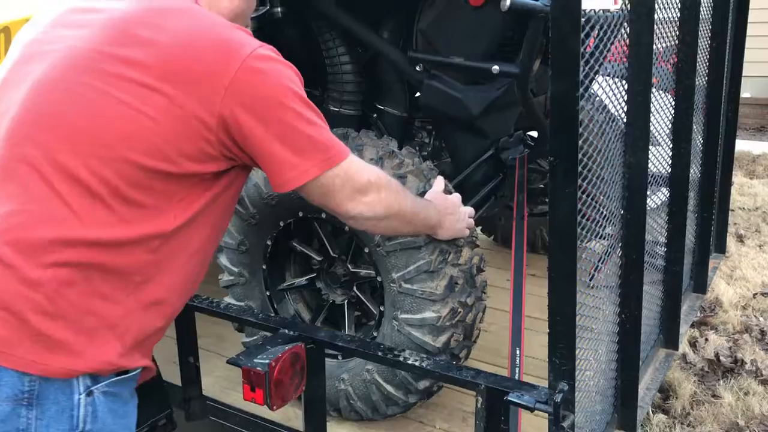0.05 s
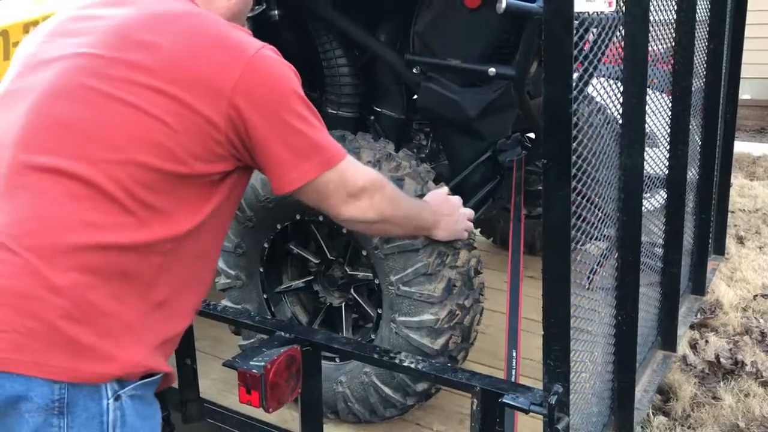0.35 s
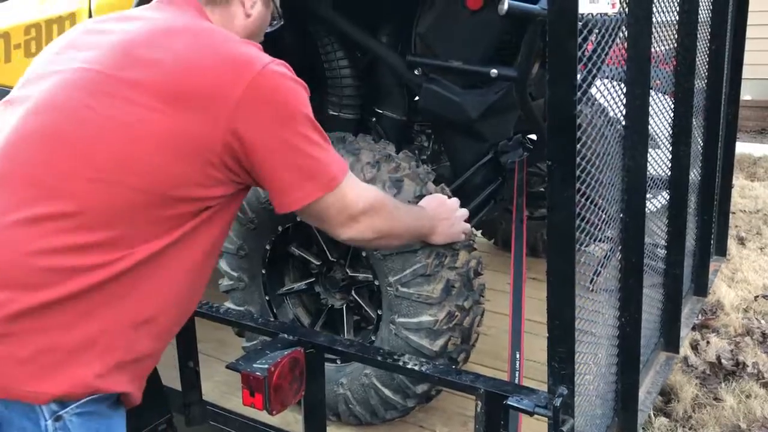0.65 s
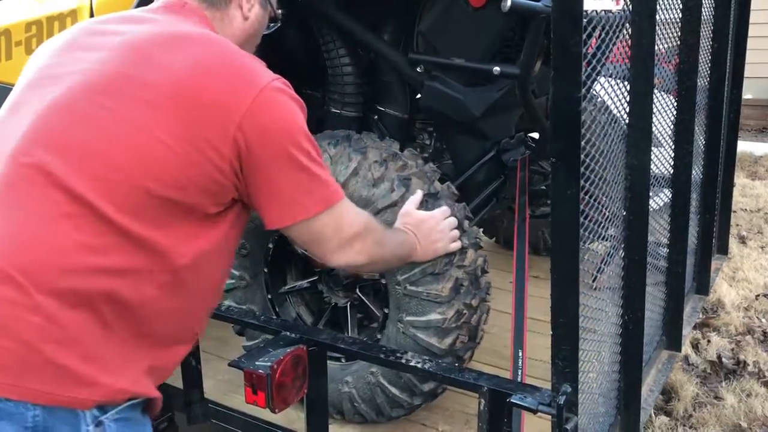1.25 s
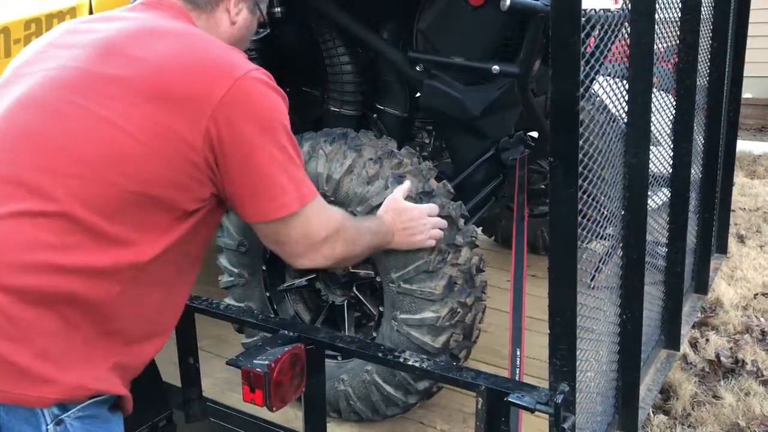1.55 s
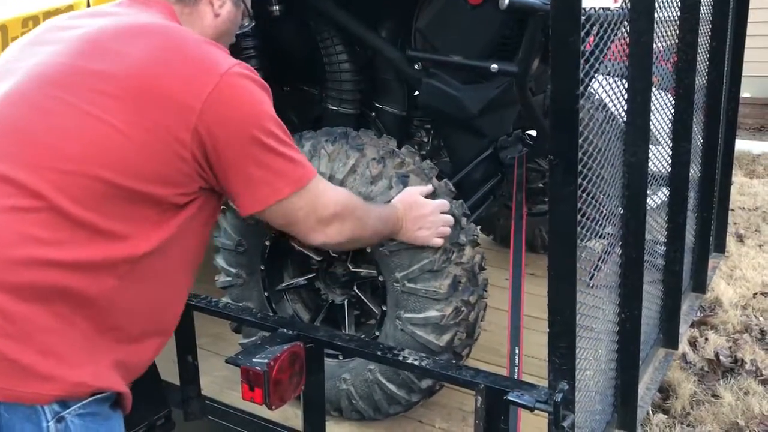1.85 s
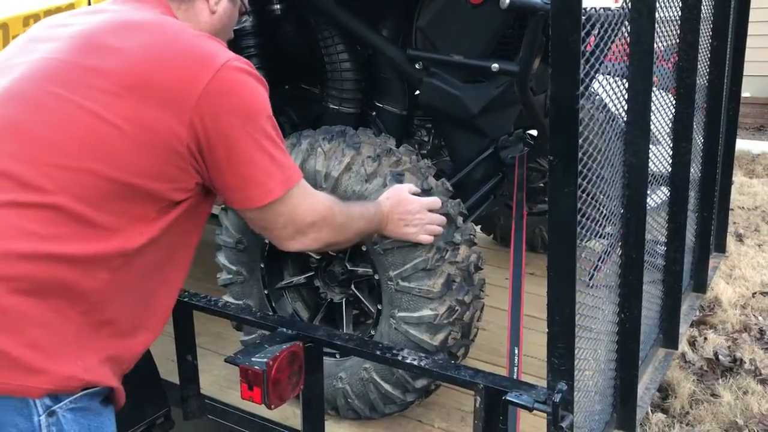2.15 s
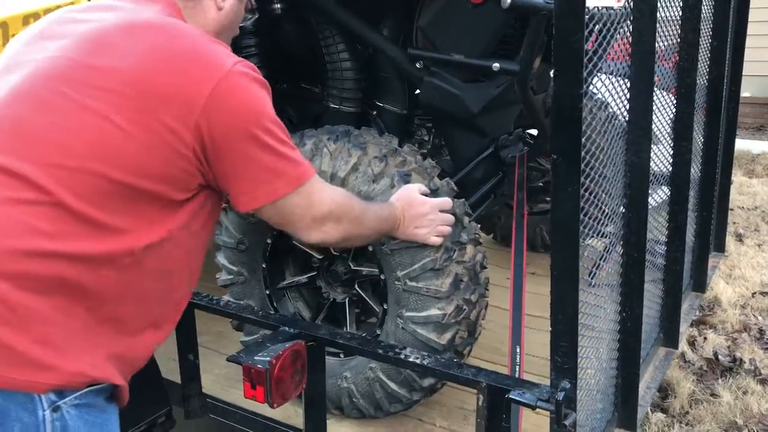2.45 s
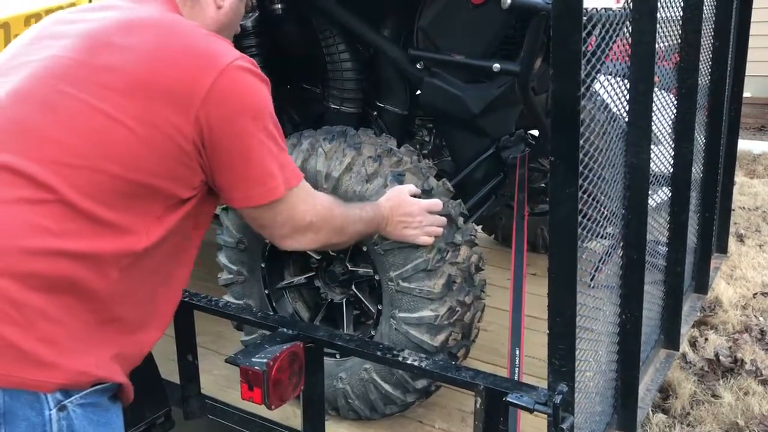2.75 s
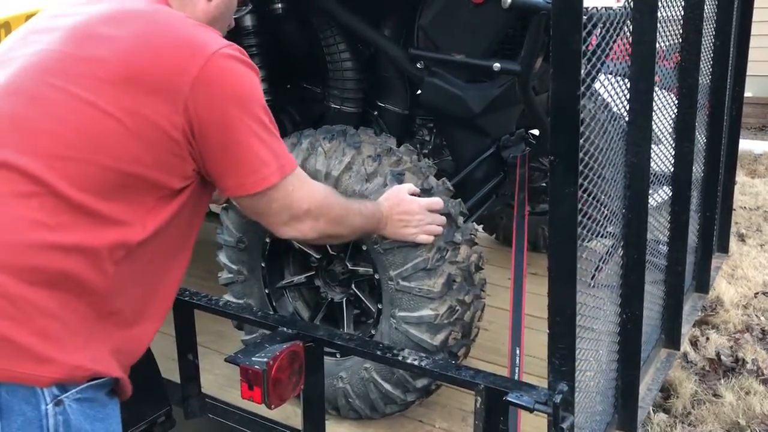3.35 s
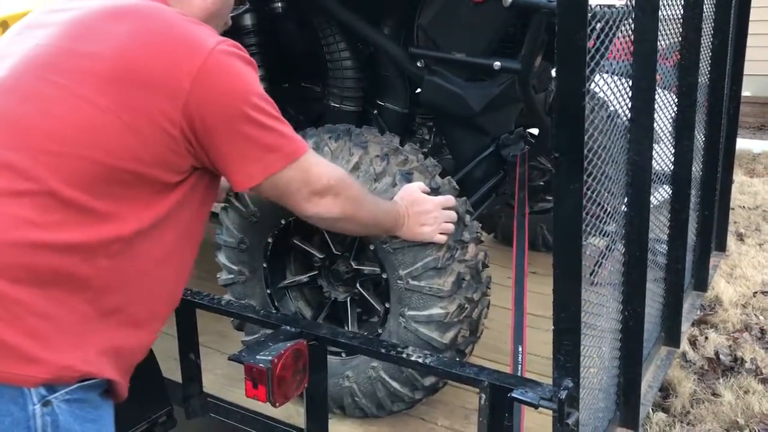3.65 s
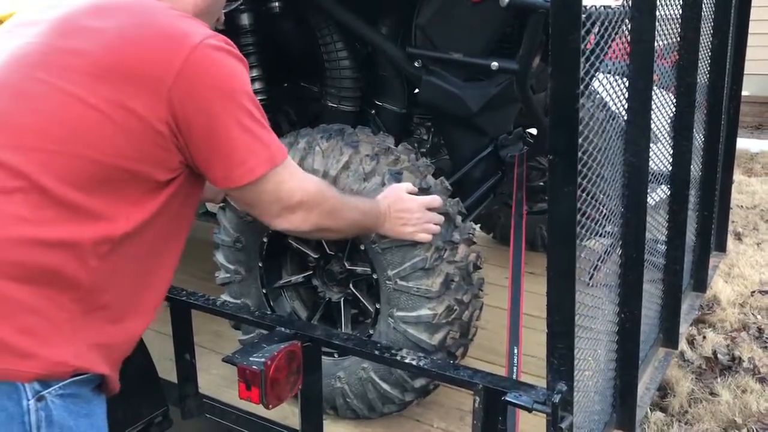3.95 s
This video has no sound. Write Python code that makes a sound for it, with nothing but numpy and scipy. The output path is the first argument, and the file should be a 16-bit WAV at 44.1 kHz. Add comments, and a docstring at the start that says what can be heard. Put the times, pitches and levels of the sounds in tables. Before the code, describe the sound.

Close metallic clunks come from a loose suspension joint, sparse at first, then in an even back-and-forth rhythm. Behind them, a hand rustles on the tire, small hardware clinks and a trailer rumbles in quiet outdoor air.

```python
"""Outdoors on a trailer, an off-road tyre is rocked by hand. A loose suspension joint scrapes through its
play and knocks between two steel stops: one clean clunk on each push, a short stutter on each pull.
Underneath, the trailer thuds and rumbles. Hand and shirt rub on the tread, grit ticks, the linkage
clinks and small hardware jingles, all over a bed of quiet air."""
import sys
import numpy as np
from scipy import signal
from scipy.fft import irfft
from scipy.io import wavfile
from scipy.ndimage import uniform_filter1d

SR = 44100
rng = np.random.default_rng(int(sys.argv[2]) if len(sys.argv) > 2 else 0)


def dump_mix(stems):
    """Bounce the given channels to the path in sys.argv[1] as a 16-bit WAV at rate SR."""
    frames = np.atleast_2d(stems).T  # one column per channel
    limited = np.clip(frames, -1, 1)  # hard clip at full scale
    pcm = np.round(limited * 32767).astype(np.int16)
    wavfile.write(sys.argv[1], SR, pcm)


N = 176400
T = np.arange(N) / SR
AGE = T[:SR // 2]  # time since a hit

# Levels are relative. A colour is a noise spectrum, per Hz; only its shape counts.
# colour of the outdoor air: f/Hz, level/dB
AIR_COLOUR = [(25, -18), (50, 16.5), (100, 18.5), (200, 7), (350, 0.5), (700, -3.5), (1500, -6), (4000, -3),
              (8000, -7), (11000, -9.5), (13000, -15), (16000, -16.5)]
# rumble of the rocking trailer, as a fader ride: t/s, level/dB
RUMBLE_RIDE = [(0, -79.5), (.6, -64.5), (1.4, -62.5), (1.65, -73), (2, -60.5), (2.5, -62), (2.9, -51),
               (3.2, -55), (3.7, -56.5), (4, -54)]
# colour of that rumble: f/Hz, level/dB
RUMBLE_COLOUR = [(20, -45), (32, -42), (55, -3.5), (110, 1), (220, 2), (400, -6), (600, -12.5), (1000, -15),
                 (2000, -23), (6000, -49)]
# thuds of the trailer deck: t/s, boom/dB, clatter/dB, rise/s
THUDS = [(.412, -12.5, -38, 0.0071), (0.501, -20.5, -5, 0.0013), (.688, 0.5, -0.5, 0.0033),
         (1.949, -17.5, -13.5, 0.0053), (2.162, -17, -10.5, 0.0016), (2.257, -19.5, -17, 0.0027),
         (2.759, -1, -6, .003), (3.021, -4, 1.5, 0.0018), (3.33, 0, -8.5, .003), (3.545, -4, -6.5, 0.0056),
         (3.615, 1, 5, 0.017), (3.924, 4, 3.5, 0.002)]
# booming modes of the deck: f/Hz, level/dB, t60/s
DECK_MODES = [(116.3, -53.5, 0.53), (179, -60.5, 0.36), (213.3, -41.5, 0.31), (327.7, -45, 0.22),
              (363.3, -49, 0.23), (421, -50, 0.23), (542.2, -44, .15)]
# clatter of loose boards and mesh: f/Hz, level/dB
CLATTER_COLOUR = [(120, -12), (350, -1.5), (560, 4.5), (800, -4), (1050, -6), (1500, -11), (2200, -21.5),
                  (4500, -32), (9000, -46), (15000, -54)]
# strokes of hand and shirt: middle/s, half length/s, hiss/dB, scuff/dB
RUBS = [(0.266, 0.14, -67.5, -89), (0.479, 0.094, -60, -66.5), (0.683, 0.074, -69, -73),
        (0.919, 0.03, -69, -61.5), (0.98, 0.054, -60.5, -58), (1.064, 0.043, -71, -59.5),
        (1.472, 0.065, -60.5, -60), (1.785, .05, -64.5, -68.5), (2.057, 0.084, -68, -79),
        (3.716, 0.035, -71.5, -58)]
# airy top of a rub: f/Hz, level/dB
HISS_COLOUR = [(400, -7), (1500, -1), (4000, 2), (8000, 0), (12000, -7.5), (16000, -11)]
# low body of a rub: f/Hz, level/dB
SCUFF_COLOUR = [(200, -21), (390, -14), (500, 1.5), (680, -0.5), (780, -4.5), (870, 4.5), (1020, -6.5),
                (1250, -3), (1700, -10), (2500, -12), (8000, -29.5)]
# crackle of dry dirt: f/Hz, level/dB
DIRT_COLOUR = [(1000, -22), (4000, -2), (8000, 0), (16000, -12)]
# grit ticking in the tread: t/s, level/dB, centre/Hz, width/octaves
TICKS = [(0.459, -42, 8300, 0.3), (0.472, -45, 7500, .5), (0.5203, -41.5, 5500, .6),
         (0.758, -42.5, 6400, .35), (0.8382, -36.5, 6800, 0.3), (1.136, -47.5, 5300, .6),
         (2.1554, -49.5, 7000, .6), (2.1846, -36, 12500, 1.7)]
# jingles of loose hardware: t/s, level/dB, favoured pitch/Hz
JINGLES = [(2.312, -63.5, 4170), (2.435, -74, 10400), (2.82, -75, 8500), (3.021, -57, 4770),
           (3.313, -60.5, 4900), (3.32, -67, 12000), (3.426, -63, 6700), (3.621, -54, 3420),
           (3.631, -73, 8700), (3.71, -73, 10200), (3.926, -72, 3200), (3.945, -82, 6050)]
# modes of that hardware: f/Hz, level/dB
JINGLE_MODES = [(2700, 6), (3150, 4.5), (4330, 3.5), (4700, -2), (5150, 4.5), (6080, 1.5), (6620, -2),
                (7020, -3), (8350, 0), (8780, 4), (10120, 2), (10520, -4), (12700, -6), (14500, 1)]
# light clinks of the linkage: t/s, level/dB
CLINKS = [(.242, -60.5), (1.163, -43), (1.313, -46.5), (1.486, -51), (1.669, -61.5), (1.806, -52.5),
          (2.536, -55)]
# colour of a clink: f/Hz, level/dB
CLINK_COLOUR = [(300, -11), (900, 1), (1600, 2), (2500, 2), (3500, -1), (4500, -13), (9000, -21.5),
                (15000, -26)]
# scrape of the joint sliding through its play: f/Hz, level/dB
SLIDE_COLOUR = [(25, -35), (60, -11), (260, 1.5), (600, -2), (1500, -5), (2400, -14), (3400, -10),
                (8000, -17.5), (15000, -38)]
# bright crack from the dense upper modes of the steel: f/Hz, level/dB
STEEL_COLOUR = [(30, -47), (300, -10), (800, -1), (1100, -1), (1800, 3), (2400, -9.5), (3200, 1),
                (3900, -7.5), (4600, -5), (5600, -8), (7500, -7), (10000, -11.5), (13000, -20),
                (16000, -27)]
# the trailer shaking after a knock: f/Hz, level/dB
SHAKE_COLOUR = [(50, -19), (110, -8.5), (215, -1.5), (350, -5.5), (550, -6), (800, -12.5), (1300, -13),
                (2000, -18.5), (4000, -29.5), (12000, -60)]
# knocks on the pull: first contact/s, ring/dB, crack/dB, shake/dB, gap to the hard contact/s
PULLS = [(0.1774, -12.5, -18.5, -16, 0.0056), (1.2045, -3, -0.5, -6, 0.0078),
         (1.8306, -2.5, -2.5, -4.5, 0.0071), (2.3871, -1, 0.5, -2.5, 0.0068),
         (2.969, -1.5, -2, -0.5, .0078), (3.578, -3.5, -0.5, 0, .0075)]
# contacts within one pull: delay/gaps, ring/dB, crack/dB, crack tilt/(dB per octave), rise/s
STUTTER = [(0, 2, -5.5, -2.5, 0.001), (1.002, -2, 1, -1.5, 0.00073), (1.9, -6.5, -1, -6, 0.0009),
           (2.701, -15.5, -9, -7, .002)]
# modes of the joint at the pull stop: f/Hz, level/dB, t60/s
PULL_MODES = [(229, -37.5, 0.084), (258, -36.5, 0.092), (340.6, -34.5, 0.098), (423.5, -47, 0.077),
              (521, -43, .11), (609, -45.5, 0.14), (730, -42, 0.03), (1096, -45, 0.083),
              (1311, -48.5, 0.11), (1510, -43, 0.077), (1696, -52, 0.087), (1761, -37, 0.036),
              (1909, -38.5, 0.03), (3264, -49, 0.077)]
# clunks on the push: t/s, ring/dB, crack/dB, shake/dB
PUSHES = [(.686, -4.5, -0.5, -3.5), (1.449, -12.5, -16.5, -13), (2.076, -10, -13.5, -13),
          (2.6478, -2.5, -0.5, -5), (3.2495, -2.5, -0.5, -4.5), (3.869, -3, -1.5, -4)]
# modes of the joint at the push stop: f/Hz, level/dB, t60/s
PUSH_MODES = [(161.5, -40.5, 0.21), (270.4, -33, 0.13), (318, -33.5, 0.071), (362.8, -29, 0.081),
              (528, -44.5, 0.17), (602, -43.5, 0.2), (712, -47.5, .1), (1048, -38.5, 0.083),
              (1134, -40, 0.15), (1264, -53, 0.074), (1392, -43.5, 0.12), (1564, -37.5, .07),
              (1672, -33.5, 0.077), (3140, -40, 0.049)]

AIR_DB, CLATTER_DB, SLIDE_DB, ZING_DB, SHAKE_DB = -66, -40, -49.5, -52, -40.5
PUSH_CRACK_DB, PULL_CRACK_DB = -34, -36.5
CRACK_T60_S, SLIDE_T60_S, TICK_T60_S, RING_RISE_S = .064, .12, .0055, .00088


def undb(db):
    """Decibels to gain."""
    return 10 ** (np.asarray(db) / 20)


def add(out, at_s, sound):
    """Drop a sound into the mix at its cue."""
    i = max(int(at_s * SR), 0)
    out[i:i + len(sound)] += sound[:N - i]


def noise(colour, size):
    """Coloured noise at unit RMS."""
    hz, db = np.array(colour).T
    f = np.maximum(np.fft.rfftfreq(size, 1 / SR), 1)
    gain = undb(np.interp(np.log(f), np.log(hz), db))
    y = irfft(gain * np.exp(2j * np.pi * rng.random(len(f))), size)
    return y / y.std()


def fade(t60_s, rise_s):
    """Envelope of a hit: fast attack, exponential tail."""
    return (1 - np.exp(-AGE / max(rise_s, 1 / SR))) * np.exp(-np.log(1000) * AGE / t60_s)


def burst(colour, t60_s, rise_s):
    """Many close modes struck at once blur into dying noise."""
    return noise(colour, len(AGE)) * fade(t60_s, rise_s)


def ring(modes, rise_s):
    """Distinct modes struck at once, neighbours swinging in opposite directions."""
    return sum((-1) ** k * undb(db) * np.sin(2 * np.pi * hz * AGE) * fade(t60, rise_s)
               for k, (hz, db, t60) in enumerate(modes))


def air():
    """A quiet, steady bed of outdoor air."""
    return undb(AIR_DB) * noise(AIR_COLOUR, N)


def trailer():
    """The deck thuds as the weight shifts, and rumbles more as the rocking grows."""
    out = noise(RUMBLE_COLOUR, N) * undb(np.interp(T, *np.array(RUMBLE_RIDE).T))
    for at, boom_db, clatter_db, rise in THUDS:
        boom = undb(boom_db) * ring(DECK_MODES, rise)
        clatter = undb(CLATTER_DB + clatter_db) * burst(CLATTER_COLOUR, t60_s=.16, rise_s=rise)
        add(out, at, boom + clatter)
    return out


def dirt(specks_per_s=230, scatter_db=5.5):
    """Specks of dry dirt break loose in a fine crackle, at unit RMS."""
    specks = rng.random(N) < specks_per_s / SR
    sizes = undb(scatter_db * np.minimum(rng.exponential(size=N), 4))
    crackle = signal.fftconvolve(specks * sizes, burst(DIRT_COLOUR, TICK_T60_S, rise_s=0))[:N]
    return crackle / crackle.std()


def rubs(grain_db=3, grain_s=.0028, dirt_db=-11):
    """Skin and cloth slide on rubber: grainy swells of hiss and dirt over a lower scuff."""
    hiss_gain, scuff_gain = 0, 0
    for middle, half, hiss_db, scuff_db in RUBS:
        swell = np.exp(-((T - middle) / half) ** 2)
        hiss_gain += undb(hiss_db) * swell
        scuff_gain += undb(scuff_db) * swell
    grain = uniform_filter1d(rng.standard_normal(N), int(grain_s * SR))
    hiss = hiss_gain * (noise(HISS_COLOUR, N) + undb(dirt_db) * dirt())
    scuff = scuff_gain * noise(SCUFF_COLOUR, N)
    return (hiss + scuff) * undb(grain_db * grain / grain.std())


def grit(tail_db=-11):
    """Grit ticks in the tread: a sharp, bright snap with a short tail."""
    out = np.zeros(N)
    for at, db, hz, octaves in TICKS:
        bell_curve = [(hz * 2 ** (k * octaves), -2 * k * k) for k in range(-4, 5)]
        snap = burst(bell_curve, TICK_T60_S, rise_s=0)
        tail = undb(tail_db) * burst(bell_curve, t60_s=.032, rise_s=0)
        add(out, at, undb(db) * (snap + tail))
    return out


def jingles(bounce_s=.007, bounce_db=-3.5, t60_s=.057, detune=.025, scatter_db=4, fall_db_per_octave=11):
    """Small hardware bounces three times; each bounce favours different modes."""
    out = np.zeros(N)
    for at, db, pitch in JINGLES:
        for bounce in range(3):
            modes = []
            for hz, mode_db in JINGLE_MODES:
                detuned_hz = hz * (1 + detune * rng.standard_normal())
                rolloff_db = fall_db_per_octave * abs(np.log2(hz / pitch))
                modes.append((detuned_hz, mode_db + scatter_db * rng.standard_normal() - rolloff_db, t60_s))
            delay = bounce * bounce_s * (.5 + rng.random())
            add(out, at + delay, undb(db + bounce * bounce_db) * ring(modes, RING_RISE_S))
    return out


def clinks():
    """Light metal-on-metal touches in the linkage."""
    out = np.zeros(N)
    for at, db in CLINKS:
        add(out, at, undb(db) * burst(CLINK_COLOUR, t60_s=.12, rise_s=.0014))
    return out


def slides():
    """The joint takes up its play: a short scrape swells into every knock and dies away."""
    swell = sum(undb(SLIDE_DB + ring_db) * np.exp(-np.log(1000) * np.abs(at - T) / SLIDE_T60_S)
                for at, ring_db, *_ in [*PUSHES, *PULLS])
    return swell * noise(SLIDE_COLOUR, N)


def knock_tail(crack_db, shake_db, rise_s=.0044):
    """After a knock the steel zings on faintly and the trailer shakes."""
    zing = undb(ZING_DB + crack_db) * burst(STEEL_COLOUR, t60_s=.25, rise_s=rise_s)
    shake = undb(SHAKE_DB + shake_db) * burst(SHAKE_COLOUR, t60_s=.36, rise_s=rise_s)
    return zing + shake


def pulls(detune=.013):
    """The joint touches the pull stop, hits it hard and bounces: a tight stutter."""
    out = np.zeros(N)
    cracks = [burst([(hz, db + tilt * np.log2(hz)) for hz, db in STEEL_COLOUR], CRACK_T60_S, rise)
              for *_, tilt, rise in STUTTER]
    for at, ring_db, crack_db, shake_db, gap in PULLS:
        # each pull loads the joint a little differently, shifting its modes
        modes = [(hz * (1 + detune * rng.standard_normal()), db, t60) for hz, db, t60 in PULL_MODES]
        for (delay, body_db, edge_db, _, rise), crack in zip(STUTTER, cracks):
            body = undb(ring_db + body_db) * ring(modes, rise)
            edge = undb(PULL_CRACK_DB + crack_db + edge_db) * crack
            add(out, at + delay * gap, body + edge)
        add(out, at + gap, knock_tail(crack_db, shake_db))
    return out


def pushes():
    """The joint hits the push stop squarely: one clean clunk, with the same ring every time."""
    out = np.zeros(N)
    body = ring(PUSH_MODES, RING_RISE_S)
    crack = undb(PUSH_CRACK_DB) * burst(STEEL_COLOUR, CRACK_T60_S, rise_s=.00033)
    for at, ring_db, crack_db, shake_db in PUSHES:
        add(out, at, undb(ring_db) * body + undb(crack_db) * crack + knock_tail(crack_db, shake_db))
    return out


def scene():
    """Mono mix: the joint up front, trailer and small details behind, air underneath."""
    joint = slides() + pushes() + pulls()
    return (joint + trailer() + clinks() + grit() + jingles() + rubs() + air())[None]


def record(dry, open_s=.083, top_hz=16200):
    """The mix opens after a moment of silence; a steep low-pass trims the very top."""
    lowpass = signal.ellip(8, .2, 70, top_hz, fs=SR, output="sos")
    return signal.sosfilt(lowpass, dry * (T > open_s))


dry = scene()
out = record(dry)
dump_mix(out)
```